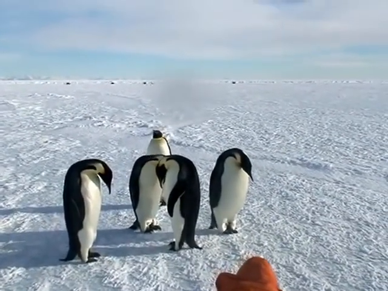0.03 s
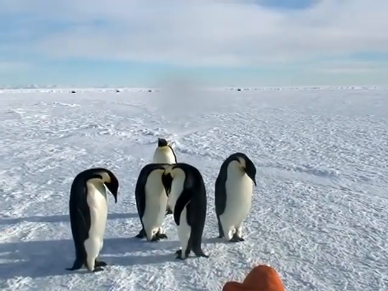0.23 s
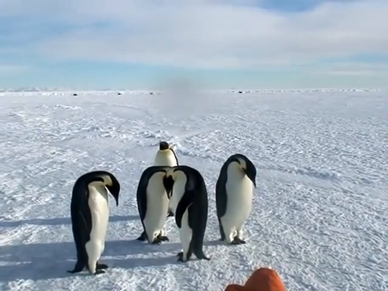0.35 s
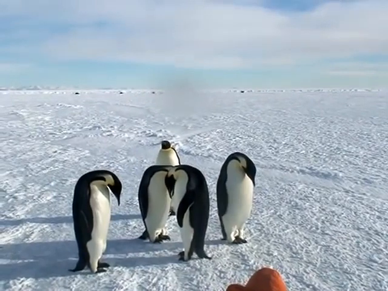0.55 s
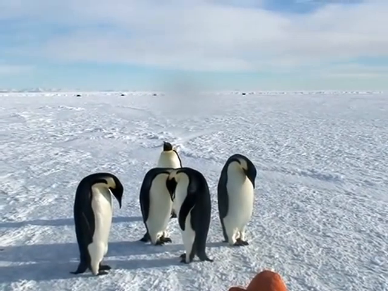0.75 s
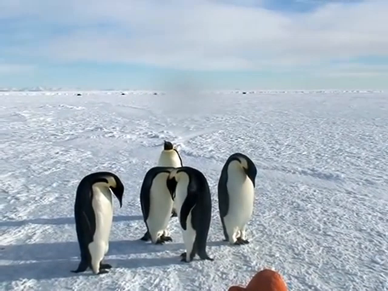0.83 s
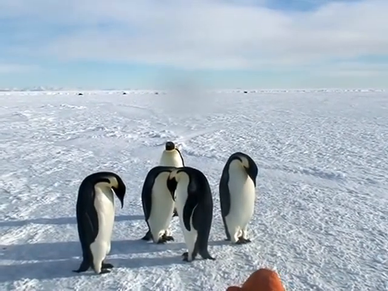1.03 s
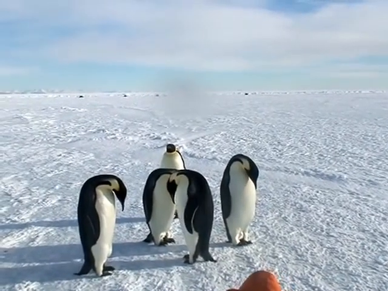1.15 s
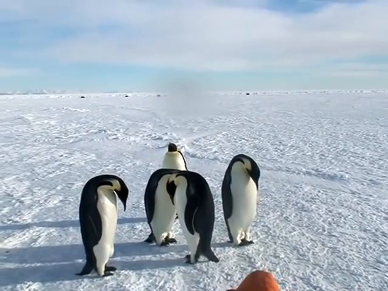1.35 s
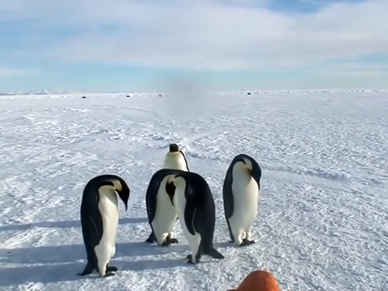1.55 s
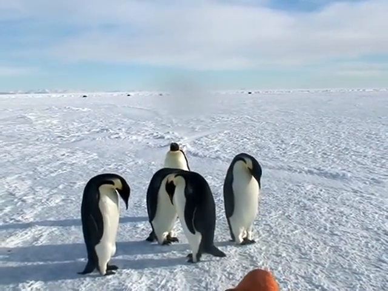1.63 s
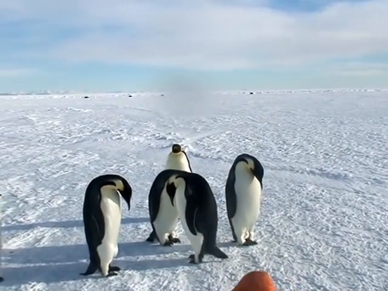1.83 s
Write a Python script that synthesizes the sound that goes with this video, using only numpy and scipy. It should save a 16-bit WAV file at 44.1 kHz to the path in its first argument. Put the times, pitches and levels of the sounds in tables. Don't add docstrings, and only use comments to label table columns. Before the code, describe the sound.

Crisp snow crunches and ice ticks, then a loud nasal penguin call beating between two close pitches, short bursts growing longer and ending abruptly; faint steps afterwards, steady hiss and low wind, recorded outdoors nearby.

```python
import sys
import numpy as np
from scipy import signal
from scipy.fft import rfft, irfft, next_fast_len
from scipy.io import wavfile
from scipy.ndimage import uniform_filter1d

SR = 44100
rng = np.random.default_rng(int(sys.argv[2]) if len(sys.argv) > 2 else 0)


def gain_from_db(level_db):
    decades = np.asarray(level_db, float) / 20
    return 10 ** decades


def transcribe(signal):
    frames = np.atleast_2d(signal).T
    limited = np.clip(frames, -1, 1)
    pcm = np.round(limited * 32767).astype(np.int16)
    wavfile.write(sys.argv[1], SR, pcm)


N = 83790
LEFT_RIGHT = np.array([[1], [-1]])


def level(x, db):
    return x * gain_from_db(db) / np.sqrt(np.mean(x ** 2))


def curve(f, points):
    p = np.array(points, float)
    return np.interp(np.log(f + 1), np.log(p[:, 0]), p[:, 1])


def colour(x, db_of):
    size = 2 ** 13
    half = size // 2
    cepstrum = irfft(db_of(np.arange(half + 1) * SR / size) * np.log(10) / 20)
    cepstrum[1:half] *= 2
    cepstrum[half + 1:] = 0
    impulse = irfft(np.exp(rfft(cepstrum)))[:half]
    return signal.fftconvolve(x, impulse)[:N]


def band(x, hz, q):
    return signal.lfilter(*signal.iirpeak(min(hz, .4 * SR), max(q, .3), fs=SR), x)


def filtered(x, order, hz, kind="low"):
    return signal.lfilter(*signal.butter(order, hz, kind, fs=SR), x)


def walk(rate_hz):
    hold = int(SR / rate_hz)
    steps = np.repeat(rng.standard_normal(N // hold + 1), hold)
    return 1.292 * uniform_filter1d(uniform_filter1d(steps, hold), hold)[:N]


# [f/Hz, density/dB per Hz]
AIR_SPECTRUM = [(12, -10), (20, -4), (103, -7.5), (202, -2.5), (3450, -16), (6360, -16), (10500, -26),
                (12100, -19), (15500, -28)]


def hiss():
    level_db, likeness, ports_agree_hz = -44, .67, 9900

    def noise():
        x = colour(rng.standard_normal(N), lambda f: curve(f, AIR_SPECTRUM))
        return level(x * gain_from_db(0.5 * walk(12.2)), level_db)

    mid = noise()
    side = filtered(noise(), 4, ports_agree_hz)
    return np.sqrt((1 + likeness) / 2) * mid + np.sqrt((1 - likeness) / 2) * side * LEFT_RIGHT


def hum(t):
    hz, width_hz, level_db, start_db, fade_s = 106.3, 19, -56, 11.5, .26
    x = band(rng.standard_normal(N), hz, hz / width_hz)
    return level(band(x, hz, 5.3), level_db) * gain_from_db(start_db * np.exp(-t / fade_s))


def wind(t):
    level_db, top_hz, gust_s, gust_db = -76, 40, 1.7, 18
    x = level(filtered(rng.standard_normal((2, N)), 3, top_hz), level_db)
    return x * gain_from_db(gust_db * (t > gust_s))


# [t/s, length/s, level/dB, f/Hz, rate/grains per s]
SNOW_CRUNCHES = [
    (0.038, .015, -28, 300, 1800),
    (0, 0.027, -36, 1030, 1600),
    (1.4, .04, -39, 4800, 7100),
    (0.068, 0.027, -32.5, 330, 2000),
    (.115, 0.12, -36.5, 190, 1100),
    (.4, 0.25, -41.5, 188, 890),
    (1.774, .008, -41, 600, 570),
    (1.773, 0.015, -42, 4800, 3100),
]
# [t/s, peak level/dB, f/Hz]
SNAP_TICKS = [(.005, -26, 1970), (.0095, -23, 2570), (.0275, -24.5, 700), (.0305, -21, 630),
              (0.0336, -24.5, 750), (0.0383, -21.5, 2350), (0.0554, -23.5, 2420), (.061, -22, 800),
              (0.079, -22, 2000), (.092, -25.5, 2350), (.098, -28, 1400), (1.686, -34, 1194),
              (1.727, -39, 2160), (1.784, -29, 1510), (1.863, -26, 5000)]


def crunches():
    out = np.zeros(N)
    for start_s, length_s, db, hz, rate in SNOW_CRUNCHES:
        gap, size, sign = rng.random((300, 3)).T
        at = start_s + np.cumsum(-np.log(1 - gap) / rate)
        ok = (at < start_s + length_s) & (at * SR < N - 1)
        clicks = np.zeros(N)
        clicks[(at[ok] * SR).astype(int)] = (gain_from_db(-2.5 * np.log(1 - size)) * np.sign(sign - .5))[ok]
        out += level(band(clicks, hz, 2.2) + 0.0061 * clicks, db) * np.sqrt(length_s * SR / N)
    return out


def ticks():
    out = np.zeros(N)
    for at_s, peak_db, hz in SNAP_TICKS:
        x = np.zeros(N)
        x[min(int(at_s * SR), N - 1)] = 1
        x = band(band(x, hz, 1.0), hz, 1.0)
        out += gain_from_db(peak_db) * x / np.abs(x).max()
    return out


# [f/Hz, level/dB]
PIPE_SLOPE = [(150, -10.5), (400, -8), (800, -9.5), (2000, -14.5), (4000, -17.5), (6000, -30), (9000, -42),
              (15000, -48)]
# [f/Hz, width/Hz, level/dB]
PIPE_BUMPS = [(475.6, 52, 4), (385, 19, -2.5), (803, 177, 9.5), (625, 195, -3), (1000, 69, -3),
              (1080, 81, 7), (1910, 350, 2.5), (2460, 46, 3), (7480, 92, 1.5), (9580, 390, -7.5),
              (11850, 360, 4), (15300, 470, -30)]
# [f/Hz, width/Hz, level/dB]
EARLY_BEAK = [(1860, 220, 9), (5300, 880, 8.5), (1400, 89, 1), (2650, 610, 5.5)]
MIDDLE_BEAK = [(4600, 380, -6), (6350, 200, 4), (7900, 300, -5)]
LATE_BEAK = [(2100, 85, -17), (4020, 140, 6), (4400, 170, -12), (4800, 120, 5), (5550, 220, -9),
             (2570, 90, 3), (6750, 200, -7), (8300, 300, -5)]


def pipe(x, t):
    change_s, change_span_s, middle_s, middle_span_s = .55, .25, .83, .19
    open_s, open_db, open_hz = 1.43, -10.5, 5295

    def bumps(f, rows):
        return sum(db * np.exp(-.5 * ((f - hz) / width) ** 2) for hz, width, db in rows)

    def shaped(beak):
        return colour(x, lambda f: curve(f, PIPE_SLOPE) + bumps(f, PIPE_BUMPS + beak))

    x = signal.sosfilt(signal.butter(3, 280, "high", fs=SR, output="sos"), x)
    early = 1 / (1 + np.exp((t - change_s) / change_span_s))
    middle = np.exp(-((t - middle_s) / middle_span_s) ** 4)
    x = early * shaped(EARLY_BEAK) + (1 - early) * shaped(LATE_BEAK)
    x = x + (t > open_s) * gain_from_db(open_db) * filtered(x, 2, open_hz, "high")
    return (1 - middle) * x + middle * colour(x, lambda f: bumps(f, MIDDLE_BEAK))


def slack_membrane(x, dull_hz):
    return filtered(filtered(x, 2, dull_hz), 2, 550, "high")


# [t/s, level/dB]
SINGLE_FLAPS = [(0.121, -25), (.123, -23), (.1295, -16.5), (.137, -16), (.141, -14.5), (.148, -15),
                (.159, -19), (0.166, -22), (.174, -22), (.184, -23), (.187, -16.5), (.193, -35),
                (.198, -24), (0.202, -37), (0.213, -21.5)]


def flaps():
    at, db = np.array(SINGLE_FLAPS).T
    x = np.zeros(N)
    x[(at * SR).astype(int)] = -gain_from_db(db)
    x = pipe(slack_membrane(x, 4200), 0.)
    return x * gain_from_db(db.max()) / np.abs(x).max()


# [t/s, length/s, rate/pulses per s, level/dB, dullness f/Hz]
CREAK_RUNS = [
    (.12, 0.094, 282, -33.5, 5300),
    (0.183, 0.11, 247, -30, 5250),
    (.275, 0.07, 210, -39, 2970),
    (.413, 0.13, 222, -28, 1520),
    (0.618, 0.022, 110, -47, 1511),
    (0.642, 0.0062, 296, -26.5, 3504),
    (0.816, 0.058, 320, -30, 1819),
    (1.006, 0.034, 264, -29, 1802),
    (1.396, 0.048, 266, -32, 1830),
    (1.639, 0.02, 254, -30, 4052),
]


def creaks():
    puff = np.exp(-np.arange(400) / SR / 0.0024)
    out = np.zeros(N)
    for start_s, length_s, rate, db, dull_hz in CREAK_RUNS:
        uneven_gap, uneven_size = rng.standard_normal((40, 2)).T
        gaps = np.exp(.5 * uneven_gap) / rate
        at = start_s + np.cumsum(gaps) - gaps[0]
        sizes = gain_from_db(1.2 * uneven_size - 6 * (at - start_s) / length_s)
        ok = at < start_s + length_s
        clicks = np.zeros(N)
        clicks[(at[ok] * SR).astype(int)] = sizes[ok]
        puffs = 0.11 * np.convolve(clicks, puff)[:N] * rng.standard_normal(N)
        x = pipe(slack_membrane(puffs - clicks, dull_hz), start_s)
        out += level(x, db) * np.sqrt(length_s * SR / N)
    return out


# (level/dB, fundamental level/dB, timing pull/rad, size swing, pull phase/rad, swing phase/rad)
UPPER_HALF = (1, -7., .34, .42, .45, np.pi)
LOWER_HALF = (-1.5, -6., .17, .1, 2.9, 2.9)


def membrane(phase, beat, rough, half):
    spread_rad, shimmer_db, breath_db, hiss_db, hiss_hz, onset_hum_db = .026, 3., -13, 10, 6000, 5.5
    db, fundamental_db, pull, swing, pull_rad, swing_rad = half
    p = phase + pull * np.sin(beat + pull_rad)
    fundamental = gain_from_db(fundamental_db + onset_hum_db * rough) * np.cos(p)
    pulses = fundamental + sum(np.cos(k * p - spread_rad * k ** 2) for k in range(2, 35))
    noise = (1 + 2.7 * np.cos(p)) * rng.standard_normal(N)
    thin_hiss = gain_from_db(hiss_db) * filtered(noise, 2, hiss_hz, "high")
    breath = gain_from_db(breath_db) * rough * 6 * noise
    size = gain_from_db(shimmer_db * rough * walk(300)) * (1 + swing * np.cos(beat + swing_rad))
    return gain_from_db(db) * (breath + thin_hiss - size * pulses)


# [t/s, upper f/Hz, lower f/Hz, level/dB]
SYLLABLE_1 = [(.222, 389.1, 320, -22), (.237, 402.4, 332.9, -17.5), (.26, 396.8, 331.3, -14.5),
              (.271, 401.4, 326.7, -17.5), (.284, 381.3, 322.8, -44)]
SYLLABLE_2 = [(0.3, 396.2, 326, -31), (0.315, 418.6, 332.7, -15), (0.335, 453.4, 362, -12.5),
              (0.35, 450.2, 363.5, -16), (0.366, 402.8, 346.9, -15.5), (0.384, 373.8, 323, -17),
              (0.406, 372, 324.7, -14.5), (0.419, 362.4, 322.7, -25)]
SYLLABLE_3 = [(.449, 385, 330.2, -33), (.456, 402.5, 339.4, -13.5), (0.484, 472.8, 383.4, -12),
              (0.502, 431.2, 370.6, -12.5), (0.526, 385.6, 334.6, -14), (.545, 405.1, 346, -13),
              (0.574, 427.2, 361.7, -12), (0.607, 408.4, 347.4, -15.5), (.616, 397.3, 330.5, -27)]
SYLLABLE_4 = [(.65, 401.2, 340.5, -25), (0.661, 419.7, 348.7, -14), (.683, 479.5, 393, -14),
              (0.699, 443.2, 372.8, -11.5), (0.726, 396.8, 346.3, -15), (.77, 431.7, 368.7, -12),
              (0.789, 422.2, 363.7, -13.5), (0.806, 407.6, 353.4, -13), (.813, 397.7, 350.5, -26.5)]
SYLLABLE_5 = [(.848, 408, 343.7, -23), (.858, 417.4, 356.7, -13), (.882, 483, 394.2, -13),
              (0.901, 424.4, 368.8, -11.5), (0.919, 403.1, 349.4, -11.5), (.965, 443, 369.9, -13),
              (0.984, 428, 364, -11), (1.0, 414.2, 353.4, -12.5), (1.008, 395.5, 346.9, -36)]
SYLLABLE_6 = [(1.039, 434, 368.2, -24), (1.049, 448, 371.6, -11), (1.07, 486.5, 395.1, -11.5),
              (1.109, 409.3, 355.8, -13), (1.153, 445.6, 373.1, -10.5), (1.19, 428.7, 369.8, -11),
              (1.29, 436.7, 373.6, -10.5), (1.393, 453.3, 386.2, -12), (1.404, 431.2, 370.3, -24)]
SYLLABLE_7 = [(1.438, 472.5, 388, -27.5), (1.448, 489.4, 395, -9.5), (1.474, 528.8, 407.4, -12),
              (1.5, 444.7, 387.9, -11), (1.539, 461, 389.3, -11.5), (1.577, 437.3, 378.4, -13),
              (1.621, 422.5, 364, -16), (1.636, 402.2, 348, -20), (1.66, 398.2, 342, -60)]
ROUGHNESS = [(.9, .7), (.7, .3), (.6, .1), (.6, .08), (.55, .07), (.5, .02), (.6, .06)]
SUM_TONE = [.8, 1.1, 1.5, 1.3, 1.2, .15, .4]


def syllables():
    tail_s, tail_sag, tail_db = .022, .88, -35
    tables = (SYLLABLE_1, SYLLABLE_2, SYLLABLE_3, SYLLABLE_4, SYLLABLE_5, SYLLABLE_6, SYLLABLE_7)
    rows = [np.array(s, float) for s in tables]
    ends = [min(a[-1, 0] + tail_s, b[0, 0] - .003) for a, b in zip(rows, rows[1:])]
    ends.append(rows[-1][-1, 0] + tail_s)
    return [np.vstack([s, (end, *tail_sag * s[-1, 1:3], min(tail_db, s[-1, 3]))])
            for s, end in zip(rows, ends)]


def trumpet(t):
    settle_s, jitter, sum_lag_rad, bright_db, bright_hz = .05, .03, 2.3, -18, 1200
    calls = syllables()
    gain, rough, grip = np.zeros(N), np.zeros(N), np.ones(N)
    for s, (onset, plateau), sum_size in zip(calls, ROUGHNESS, SUM_TONE):
        on = (t >= s[0, 0]) & (t < s[-1, 0])
        gain[on] = gain_from_db(np.interp(t[on], s[:, 0], s[:, 3]))
        grip[on] = sum_size
        rough[on] = plateau + (onset - plateau) * np.exp(-((t[on] - s[0, 0]) / settle_s) ** 2)
    rows = np.vstack(calls)

    def phase(column):
        hz = uniform_filter1d(np.interp(t, rows[:, 0], rows[:, column]), 300)
        return 2 * np.pi / SR * np.cumsum(hz * (1 + jitter * rough * walk(400)))

    up, low = phase(1), phase(2)
    source = membrane(up, up - low, rough, UPPER_HALF) + membrane(low, up - low, rough, LOWER_HALF)
    source = source + grip * np.cos(up + low - sum_lag_rad)
    soft = filtered(source, 2, bright_hz)
    source = soft + (source - soft) * np.clip(gain / gain_from_db(bright_db), 0, 1)
    return pipe(source * gain, t) / np.std(pipe(source, t)[gain > gain_from_db(bright_db)])


# [f/Hz, level/dB]
SIDE_COLOUR = [(700, 1), (2500, -2), (7500, 7.5), (9500, 12), (11000, -45)]
# [f/Hz, level/dB]
PAN_COLOUR = [(300, .2), (700, -.5), (2400, -.6), (4400, -1.8), (8000, -1), (13000, 0)]


def scene():
    lag_rad, scatter_s, scatter_db, side_db = 1.1, .022, -20, -21
    step_s, step_pan_db = 1.7, -7.5
    t = np.arange(N) / SR
    background = hiss() + hum(t) + wind(t)
    snow = crunches() + ticks()
    bird = signal.hilbert(flaps() + creaks() + trumpet(t), next_fast_len(N))[:N]
    near = (bird * np.exp(-1j * lag_rad)).real + snow
    lag = np.arange(4096) / SR
    tails = rng.standard_normal((2, len(lag))) * np.exp(-lag / scatter_s)
    mid, side = (signal.fftconvolve(near, h / np.sqrt(np.sum(h ** 2)))[:N] for h in tails)
    side = colour(side, lambda f: curve(f, SIDE_COLOUR))
    near = near + gain_from_db(scatter_db) * mid
    both = np.array([colour(near, lambda f: sign * curve(f, PAN_COLOUR) / 2) for sign in (1, -1)])
    both = both * gain_from_db(step_pan_db / 2 * (t > step_s) * LEFT_RIGHT)
    return both + gain_from_db(side_db) * side * LEFT_RIGHT + background


def band_limit(x):
    return signal.sosfilt(signal.butter(12, 15740, fs=SR, output="sos"), x)


def record(dry):
    top = signal.ellip(8, .2, 70, 15300, fs=SR, output="sos")
    high = signal.butter(2, 200, "high", fs=SR, output="sos")
    bent = signal.sosfiltfilt(high, np.tanh(dry) - dry)
    return band_limit(signal.sosfilt(top, dry + bent))


dry = scene()
out = record(dry)
transcribe(out)
```